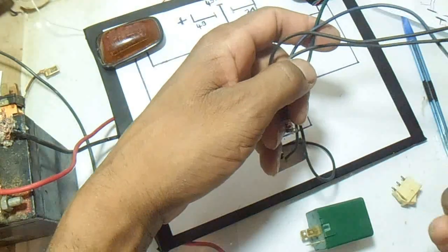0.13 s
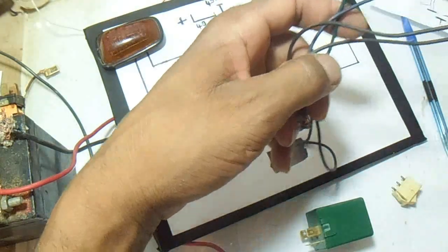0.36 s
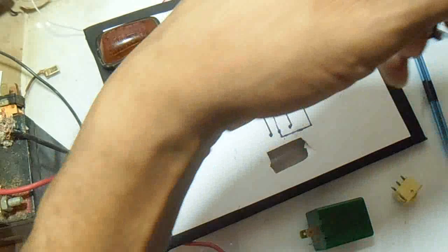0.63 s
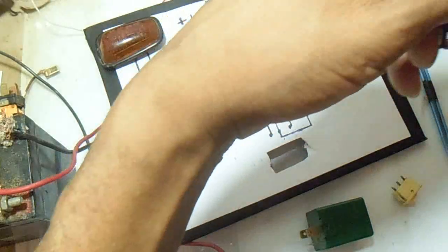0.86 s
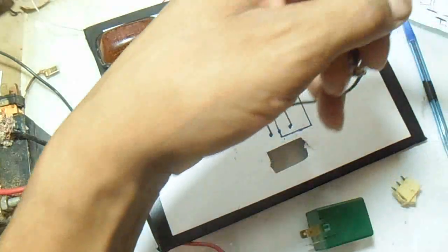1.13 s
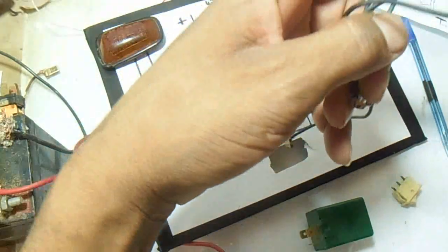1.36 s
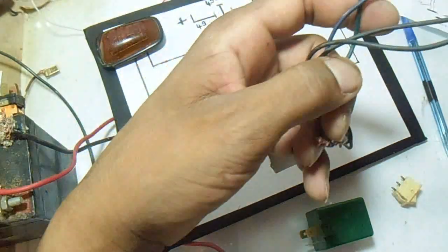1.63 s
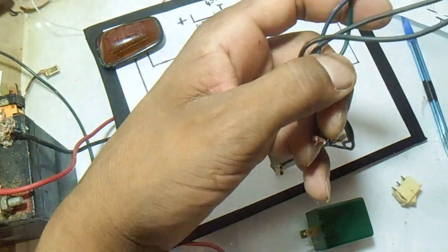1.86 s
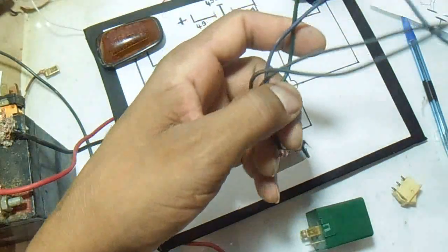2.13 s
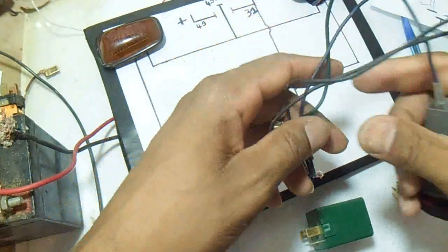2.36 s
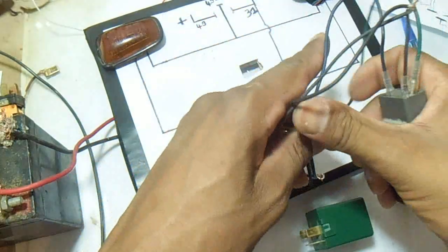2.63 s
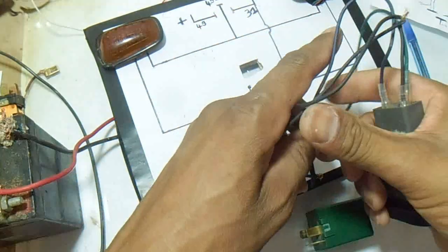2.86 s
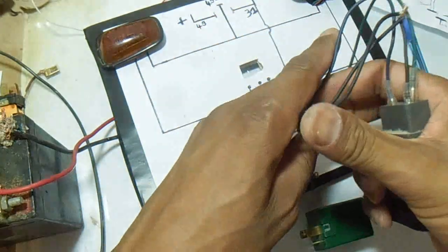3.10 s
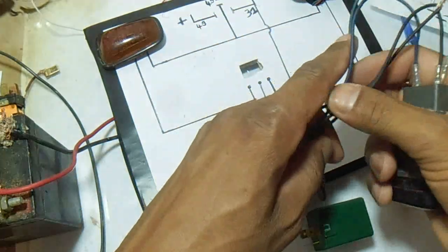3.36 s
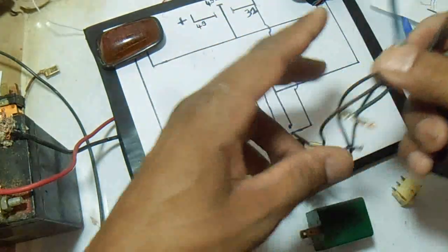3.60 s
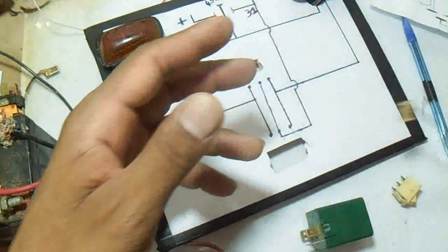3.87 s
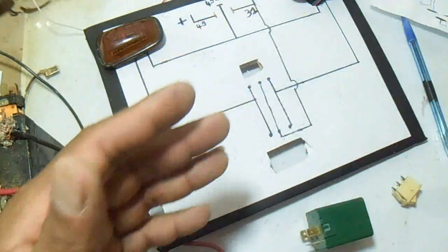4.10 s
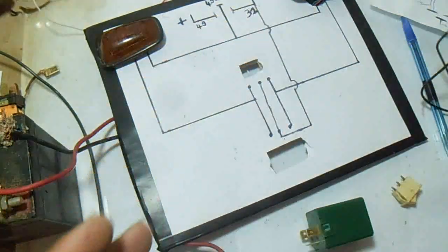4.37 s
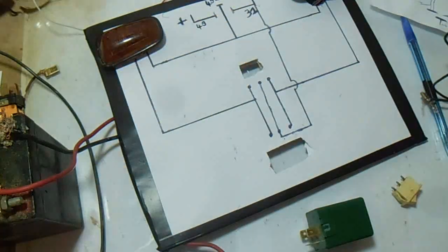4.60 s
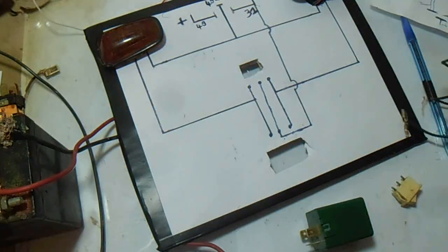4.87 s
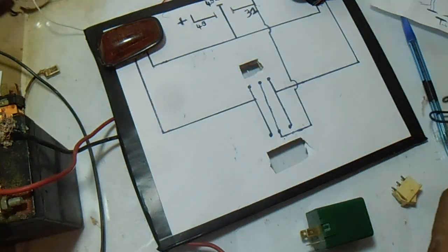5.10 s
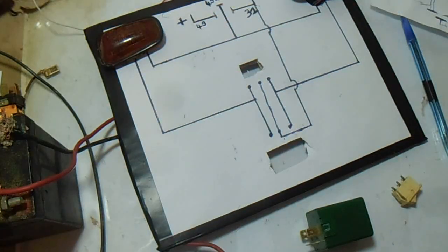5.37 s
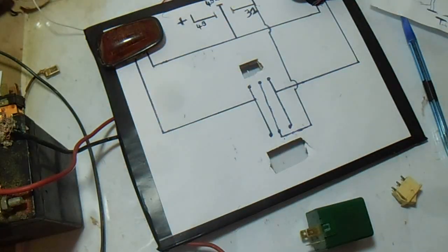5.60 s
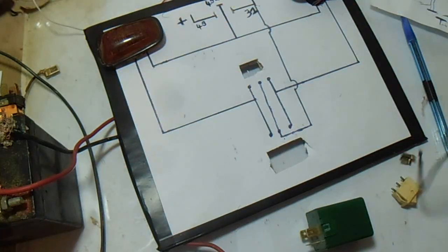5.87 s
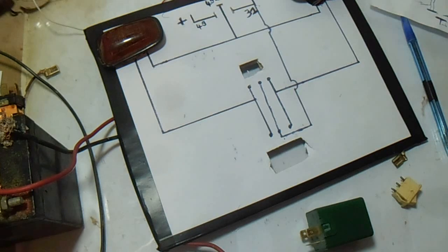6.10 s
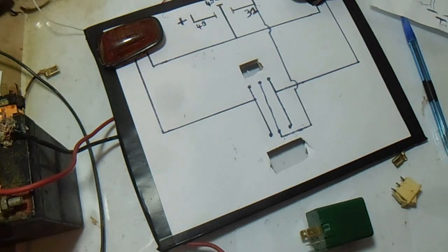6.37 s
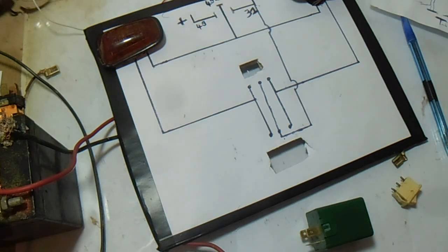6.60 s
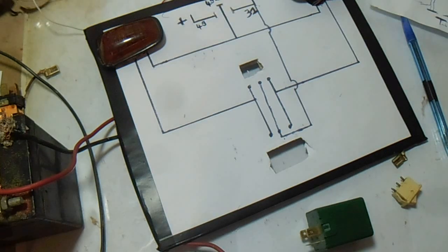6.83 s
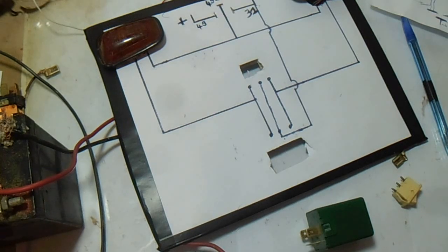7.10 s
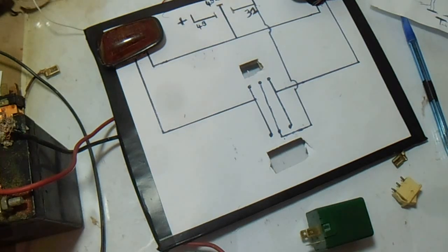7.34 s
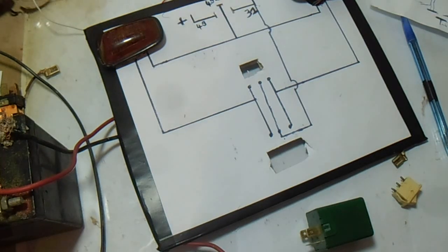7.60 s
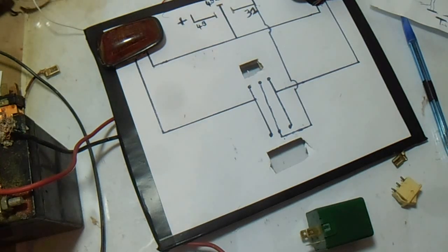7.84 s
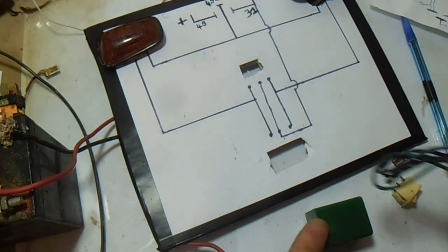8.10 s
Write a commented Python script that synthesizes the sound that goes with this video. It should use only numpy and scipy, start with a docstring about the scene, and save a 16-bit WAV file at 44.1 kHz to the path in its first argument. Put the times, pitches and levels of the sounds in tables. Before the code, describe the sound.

Close, dry clicks and rattling bounces of wires and terminals on a papered board, then a quiet lull and a final double knock.

```python
"""Hands gather a bundle of wires over a paper-covered board in a quiet small room, close under a microphone.
At first a faint tone fades over low rumble and hiss (filtered noise) while light taps (noise cracks waking
damped modes) and brushing (band-passed friction noise) begin. From 1.7 s to 5.7 s terminals and plastic parts
tap and bounce hard between strokes of wire on paper, with board thuds (pushed low modes), rough decaying tones
(sines) and room answers (decaying noise). After a lull a part is knocked down at 8 s."""
import sys
import numpy as np
from scipy import signal
from scipy.fft import rfft, irfft, next_fast_len
from scipy.io import wavfile
from scipy.ndimage import uniform_filter1d

SR = 44100
rng = np.random.default_rng(int(sys.argv[2]) if len(sys.argv) > 2 else 0)


def rack_gain(trim_db):
    """Turn a fader trim in dB into the linear factor to multiply a signal by."""
    fader = np.asarray(trim_db, float)
    return 10 ** (fader / 20)


def generate_wav(signal):
    """Clip the signal to [-1, 1] and save it as 16-bit WAV at the path in sys.argv[1]."""
    frames = np.transpose(np.atleast_2d(signal))
    scaled = np.clip(frames, -1, 1) * 32767
    pcm = np.round(scaled).astype(np.int16)
    wavfile.write(sys.argv[1], SR, pcm)


N = 362502
TIME = np.arange(N) / SR  # seconds

# Taps and bounces. Each row: start in seconds, direct peak in dB before the microphone, body near 1300 Hz in dB,
# edge near 6800 Hz in dB before a common 2 dB cut, favoured ring in Hz.
TAP_ROWS = [(0.146, -57, 21, -21, 1400), (0.257, -42.5, 7, -17, 980), (1.251, -48, -6.5, -7, 1028),
            (1.512, -41, -11.5, -4.5, 7300), (1.661, -45, 6, 0, 966), (1.71, -44.5, -16, 1, 6200),
            (1.746, 0, -26.5, -13, 7260), (1.778, -28.5, -7, -12, 2590), (1.813, -19.5, -13.5, -9, 6760),
            (1.835, -26.5, -17, -14.5, 6850), (1.845, -36.5, -12, -16, 2500), (1.862, -40, -19, -33, 4590),
            (1.915, -43, -9, -23, 2330), (1.981, -33, -9.5, -1, 2630), (2.018, -46.5, 1, -25, 1700),
            (2.028, -43, -26, -7, 2820), (2.098, -48, -13, -2, 6800), (2.134, -38.5, -10.5, -4, 2250),
            (2.161, -32, -24, -13, 7030), (2.233, -25.5, -18.5, -16, 4550), (2.248, -30, -16.5, -24, 4650),
            (2.276, -45, -13, -33, 1326), (2.355, -36, -13, -17, 2480), (2.366, -44, -20, -12.5, 2300),
            (2.569, -45.5, -8, -14, 1380), (2.927, -36, -27.5, -12.5, 3490), (2.952, -42.5, -16, -19, 4300),
            (2.993, -39.5, -17.5, -23, 2360), (3.265, -47.5, -5, -22.5, 2120), (3.285, -42, -16, -42, 2350),
            (3.333, -42.5, -20, -12, 7250), (3.352, -39, -19, -13, 5460), (3.368, -35, -18.5, -15, 5400),
            (3.374, -31.5, -4, -22, 2080), (3.386, -37.5, -3.5, -41, 2110), (3.46, -22, -16, -18, 1380),
            (3.491, -16, -17, -9.5, 4740), (3.528, -29.5, -8, -8, 1400), (3.544, -21, -18, -12, 4300),
            (3.566, -15, -15, -9, 3500), (3.581, -28, -22.5, -3, 6500), (3.775, -50.5, -28, -4, 5900),
            (3.894, -3.5, -25.5, -13.5, 5990), (3.907, -28, -27.5, -9, 5900), (3.914, -14, -19, -12, 5930),
            (4.038, -46, -9.5, -20, 5910), (4.067, -46.5, -13, -16, 2540), (4.088, -48.5, -14, -18, 3110),
            (4.13, -32.5, -17.5, -14, 5810), (4.174, -10.5, -24.5, -20.5, 5750),
            (4.185, -19.5, -21.5, -13, 5930), (4.354, -30.5, -15.5, -20, 3300),
            (4.484, -47, -16, -14.5, 6150), (4.585, -31.5, -3.5, -14.5, 1400),
            (4.699, -19, -10.5, -6.5, 1760), (4.871, -48.5, -3.5, -9, 2010), (4.974, -53, -7, -18, 3270),
            (5.058, -50.5, -19.5, -9, 3230), (5.146, -46.5, -18.5, -18, 3350),
            (5.213, -41.5, -21, -13, 3440), (5.24, -43.5, -19, -11, 2510), (5.625, -35.5, -6, -5.5, 6630),
            (5.669, -12.5, -21.5, -15, 3560), (5.714, -22.5, -25.5, -15, 3570),
            (5.736, -27.5, -23, -14, 3770), (5.872, -38.5, -28, -12, 5350), (6.217, -41, -31.5, -1.5, 6550),
            (7.847, -35, -38, -24, 3936), (7.903, -14.5, -17, -25.5, 1990), (7.907, -13, -8, -11.5, 3830),
            (8.074, -34, -29, -8, 7430), (8.082, -42.5, -7, -20, 1490), (8.101, -37, -25, -8, 6840),
            (8.118, -26.5, -2, -7.5, 3870), (8.121, 0, -15.5, -20.5, 3400), (8.143, -22, -8, -20, 2080)]
# Natural modes of the struck parts. Each row: frequency in Hz, width in Hz before extra damping, relative level in dB.
PART_MODES = [(644, 17, -14), (883.4, 30, -9), (980, 50, -11), (1474, 210, 6.5), (2194, 53, 0),
              (2534, 35, -9.5), (2820, 79, -5), (3290, 49, -10), (3560, 44, -14), (3960, 230, 1.5),
              (4550, 160, -4.5), (5340, 120, -6.5), (5930, 36, -5), (6520, 24, -12.5), (7030, 49, 1),
              (7520, 47, -2.5), (7730, 32, -11)]
# Heavier knocks that move the whole board. Each row: start in seconds, peak in dB before the microphone.
THUD_ROWS = [(1.743, -53), (3.894, -55.5), (4.173, -57.5), (5.667, -57), (7.862, -50.5), (7.902, -33.5),
             (8.12, -29.5)]
# Low modes of the board. Each row: frequency in Hz, relative level in dB, 60 dB decay time in seconds.
BOARD_MODES = [(48.77, -12.5, 0.17), (74.4, -3.5, 0.17), (129, -3.5, 0.028), (215, 0.5, .2),
               (289.8, -6.5, 0.13), (382, -8.5, 0.11), (647.4, -4, .08)]
# Quick strokes of wire over paper. Each row: start in seconds, length in seconds, direct rms level in dB
# before the microphone, centre in Hz.
SWIPE_ROWS = [(0.275, 0.054, -59.5, 6140), (1.299, 0.054, -63, 6600), (1.417, 0.048, -59, 6360),
              (4.808, 0.069, -64.5, 6500), (6.766, 0.044, -71.5, 5200), (7.877, 0.034, -55.5, 6500),
              (8.024, 0.042, -52, 3200), (1.992, 0.0347, -63, 1950)]
# Rough decaying tones: a faint one at the start, ringing near 1.3 kHz, and room tails after 4.7 s.
# Each row: start in seconds, frequency in Hz, starting amplitude in dB before roughness,
# 60 dB decay time in seconds, roughness in dB.
TONE_ROWS = [(0, 1420, -71.5, 1.6, 2), (3.461, 1345, -41, 0.28, 4.5), (3.493, 1316, -50, .3, 9),
             (3.547, 1329, -52, 0.25, 4.5), (3.566, 1363, -56, 0.32, 4), (4.701, 1530, -60.5, 0.55, 6.5),
             (4.701, 2010, -57.5, 0.38, 6)]
# Bouts of slow brushing. Each row: start in seconds, held time in seconds, then paper hiss and wire scrape
# in dB before their random unevenness.
BRUSH_BOUTS = [(.21, .02, -73.5, -84), (1.28, 0.13, -69, -74.5), (1.88, .09, -66, -64.5),
               (2.119, .13, -66, -67.5), (2.33, 0.052, -72, -71.5), (2.97, 0.056, -72, -68.5),
               (3.33, .09, -66, -66.5), (3.49, .04, -54.5, -51), (3.559, 0.051, -58, -64.5),
               (4.02, 0.11, -68, -65), (4.2, .1, -75, -58.5), (4.539, 0.12, -60.5, -67.5),
               (4.751, 0.14, -69, -77.5), (5.14, 0.13, -67, -73.5), (5.51, 0.14, -66, -75),
               (5.68, .18, -65, -74), (6.43, 0.17, -67.5, -76.5), (6.72, 0.096, -67, -77),
               (6.951, 0.031, -74, -83.5), (7.94, .1, -60, -60.5), (8.1, .015, -57, -66),
               (8.18, 0.075, -62, -66)]
# Hum of the board under the hands. Each row: time in seconds, level in dB before its random unevenness.
HUM_CURVE = [(0.0, -84.5), (1.14, -80.5), (1.42, -78.5), (2.08, -86.5), (3.16, -80.5), (3.46, -78),
             (3.75, -89.5), (4.19, -65), (4.37, -78.5), (4.6, -71.5), (4.78, -70.5), (4.97, -77.5),
             (5.2, -88.5), (6.73, -80.5), (7.51, -86), (7.92, -79), (8.04, -64.5), (8.22, -58)]
# Diffuse decay of the room. Each row: band centre in Hz, relative level in dB, 60 dB decay time in seconds.
ROOM_BANDS = [(302, -3.5, 0.16), (700, -1, 0.44), (1400, -1, 0.4075), (2970, -2.5, .45), (5000, -2, 0.4),
              (7500, -1, .3)]
# Spectrum of the rumble and hiss. Each row: frequency in Hz, relative density in dB per Hz.
FLOOR_SPECTRUM = [(12, -26), (20, -0.5), (53, -1.5), (70, -10.5), (102, -6), (122, -12.5), (285, -23.5),
                  (448, -25.5), (1350, -31), (1870, -35.5), (5220, -35), (6230, -31.5), (8000, -38.5),
                  (10400, -62), (17600, -120)]
# Swelling of the rumble. Each row: time in seconds, gain in dB.
SWELL_CURVE = [(0, 8.5), (.35, 6.5), (.55, 2), (1.0, -1), (4.6, -1), (5.1, 4.5), (5.5, -0.5), (8.22, 1.5)]

MID_PER_BODY, MID_DB = 0.43, -5  # the 2800 Hz share follows the body share
HOLLOW_DB, HOLLOW_OCTAVES = 5.5, .35  # broad hump of the struck part around its favoured ring
EVEN_SHARE = .3  # how far the crack is spread evenly over all pitches, 0-1
STRAY_COUNT = 16  # faint ticks of wire ends while the bundle moves
STRAY_DB, STRAY_SPREAD_DB, STRAY_BODY_DB, STRAY_EDGE_DB = -60.5, 1.5, -11.5, -18.5
RISE_DB_PER_S, FALL_DB_PER_S = 222.5, 160
REST_HISS_DB, REST_SCRAPE_DB = -81.5, -81.5  # hands resting
ROOM_DB, FLOOR_DB = -16.5, -65.5


def taps():
    """Modal excitation: a short rattle of contacts gives a broad crack and wakes the damped modes of the parts."""
    out, t = np.zeros(N), TIME[:4096]
    hz, width, db = np.transpose(PART_MODES)[:, :, None]
    damping = np.pi * 1.7 * width  # per second
    modes = rack_gain(db) * np.exp(-damping * t) * np.sin(2 * np.pi * hz * t)
    for s, peak_db, low_db, high_db, ring_hz in TAP_ROWS + strays():
        envelope = np.minimum(t / 0.0011, 1) * np.exp(-(t / 0.0036) ** 0.94)
        rattle = even(grit(len(t), 1.4) * envelope)
        # every blow lands elsewhere: it wakes the modes unevenly and those near one pitch most
        uneven_db = 2.5 * rng.standard_normal(len(modes))
        near_db = 10.5 * np.exp(-(np.log2(hz[:, 0] / ring_hz) / 0.072) ** 2)
        ringing = signal.fftconvolve(rattle, rack_gain(uneven_db + near_db) @ modes)[:len(t)]
        sound = rattle + rack_gain(-36.0) * ringing
        mid_db = MID_PER_BODY * low_db + MID_DB
        sound = colour(sound, [(250, low_db - 27.5), (650, low_db - 11), (1300, low_db),
                               (2800, mid_db), (4500, -14), (6800, high_db - 2)])
        hump_hz = ring_hz * 2. ** (HOLLOW_OCTAVES * np.array([-1, 0, 1]))
        sound = colour(sound, np.transpose([hump_hz, [0, HOLLOW_DB, 0]]))
        add(out, s, rack_gain(peak_db) * sound / np.abs(sound).max())
    return out


def strays():
    """Chance contact: faint ticks at random moments in and around the bouts, each favouring a random mode."""
    rows = []
    for pick, where, size, pitch in rng.random((STRAY_COUNT, 4)):
        start, held = BRUSH_BOUTS[int(pick * len(BRUSH_BOUTS))][:2]
        s = min(start + (2 * where - .5) * held, TIME[-1])
        peak_db = STRAY_DB + STRAY_SPREAD_DB * (2 * size - 1)
        ring_hz = PART_MODES[int(pitch * len(PART_MODES))][0]
        rows.append((s, peak_db, STRAY_BODY_DB, STRAY_EDGE_DB, ring_hz))
    return rows


def even(x):
    """Spectral smoothing: reduce the chance peaks and holes of a short crack."""
    db = 10 * np.log10(uniform_filter1d(np.abs(rfft(x)) ** 2, size=15) + 1e-12)
    hz = np.arange(len(db)) * SR / len(x) + 1
    return colour(x, np.transpose([hz, -EVEN_SHARE * (db - db.mean())]))


def thuds():
    """Repeated forcing: the board rocks briefly after a knock, so its low modes are pushed again and again."""
    out, t = np.zeros(N), TIME[:SR // 2]
    modes = sum(rack_gain(db) * 1000 ** (-t / t60) * np.sin(2 * np.pi * hz * t) for hz, db, t60 in BOARD_MODES)
    for s, peak_db in THUD_ROWS:
        rocking = rng.standard_normal(len(t)) * np.exp(-t / 0.013)
        pushed = signal.fftconvolve(rocking, modes)[:len(t)]
        dull_body = band(rng.standard_normal(len(t)), 190, 2.2) * 1000 ** (-t / .25)
        thud = level(pushed, 0) + level(dull_body, -3.5)
        add(out, s, rack_gain(peak_db) * thud / np.abs(thud).max())
    return out


def swipes():
    """Sliding friction: many small contacts make a gritty band of noise, flat-topped with tapered ends."""
    out = np.zeros(N)
    for s, length, db, hz in SWIPE_ROWS:
        size = int(length * SR)
        bright = band(grit(size, 1.5), hz, 0.9)
        broad = band(grit(size, 1.5), 2600, 3.6)
        stroke = bright + rack_gain(-8) * broad
        add(out, s, level(stroke * signal.windows.tukey(size, .7), db))
    return out


def decaying_tones():
    """Exponential decay: lone tones die away with a randomly uneven level."""
    out = np.zeros(N)
    for s, hz, db, t60, rough_db in TONE_ROWS:
        uneven = rack_gain(db + rough_db * walk(150))
        add(out, s, uneven * 1000 ** (-TIME / t60) * np.sin(2 * np.pi * hz * TIME))
    return out


def brushing():
    """Uneven friction: bright on the paper, duller along the wires, a hollow hum in the board."""
    hiss_db = bouts(column=2, rest_db=REST_HISS_DB)
    scrape_db = bouts(column=3, rest_db=REST_SCRAPE_DB)
    hum_db = np.interp(TIME, *np.transpose(HUM_CURVE))
    patchy_db = 3.5 * walk(30)  # shared by paper and wires
    hiss = level(band(ticks(), 6000, 0.99), 0) * rack_gain(hiss_db + patchy_db)
    scrape = level(band(ticks(), 2200, 1.4), 0) * rack_gain(scrape_db + patchy_db + 0.57 * walk(69))
    hum = level(band(rng.standard_normal(N), 330, .7), 0) * rack_gain(hum_db + 2.1 * walk(6.7))
    return hiss + scrape + hum


def bouts(column, rest_db):
    """Exponential growth and decay: each bout's level in dB rises, holds and falls at fixed rates."""
    out = np.full(N, 1. * rest_db)
    for row in BRUSH_BOUTS:
        early = np.maximum(row[0] - TIME, 0)
        late = np.maximum(TIME - row[0] - row[1], 0)
        out = np.maximum(out, row[column] - RISE_DB_PER_S * early - FALL_DB_PER_S * late)
    return out


def ticks():
    """Stick-slip: friction noise with sparse slips that each last a couple of milliseconds."""
    slips = (rng.random(N) < 120 / SR) * rng.uniform(.3, 2.2, N)  # about 120 per second
    smear = signal.lfilter([1], [1, -np.exp(-1 / (0.0013 * SR))], slips)
    return rng.standard_normal(N) * (1 + smear)


def room(x):
    """Reverberation: the diffuse answer of the walls, each band with its own decay."""
    t = TIME[:int(.7 * SR)]
    tail = sum(level(band(rng.standard_normal(len(t)), hz, 0.86), db) * 1000 ** (-t / t60)
               for hz, db, t60 in ROOM_BANDS)
    tail = tail * np.minimum(t / 0.0016, 1)
    return rack_gain(ROOM_DB) * signal.fftconvolve(x, tail / np.sqrt(np.sum(tail ** 2)))[:N]


def floor():
    """Stationary noise: steady hiss, with a rumble of the house that swells now and then."""
    air = level(colour(rng.standard_normal(N), FLOOR_SPECTRUM), FLOOR_DB)
    swell_db = np.interp(TIME, *np.transpose(SWELL_CURVE))
    return air + (rack_gain(swell_db) - 1) * band(air, 45, 2.5)


def level(x, db):
    """Mean power: scale to an rms level."""
    return x * rack_gain(db) / np.sqrt(np.mean(x ** 2))


def band(x, hz, octaves):
    """Frequency selection: band-pass around a centre."""
    edges = np.minimum(hz * 2. ** (np.array([-.5, .5]) * octaves), .45 * SR)
    return signal.sosfilt(signal.butter(2, edges, "bandpass", fs=SR, output="sos"), x)


def colour(x, points):
    """Minimum phase: a causal filter, found by folding the cepstrum, that follows (Hz, dB) points."""
    size = next_fast_len(len(x))
    hz, db = np.transpose(points)
    bin_hz = np.arange(size // 2 + 1) * SR / size + 1
    log_gain = np.interp(np.log(bin_hz), np.log(hz), db) * np.log(10) / 20
    cepstrum = irfft(log_gain, size)
    cepstrum[1:size // 2] *= 2
    cepstrum[size // 2 + 1:] = 0
    return irfft(rfft(x, size) * np.exp(rfft(cepstrum)), size)[:len(x)]


def walk(rate):
    """Random modulation: independent normal levels, rate per second, joined by ramps."""
    k = int(SR / rate)
    return uniform_filter1d(np.repeat(rng.standard_normal(N // k + 1), k), k)[:N]


def grit(size, spread_db):
    """Impulsive noise: many small contacts, a few much stronger than the rest."""
    return rng.standard_normal(size) * rack_gain(spread_db * rng.exponential(size=size))


def add(out, s, x):
    """Superposition: mix a sound in from a time in seconds."""
    i = int(s * SR)
    out[i:i + len(x)] += x[:N - i]


def scene():
    """Superposition of the close sounds and the room's answer to taps and strokes."""
    close = taps() + swipes()
    return (close + room(close) + thuds() + brushing() + decaying_tones())[None]


def roll_off(x):
    """The treble ends steeply here."""
    return signal.sosfilt(signal.butter(12, 8990, fs=SR, output="sos"), x)


def record(dry):
    """Saturation and band limiting: peaks bend, the floor joins, and treble falls steeply near 8 kHz."""
    bent = 0.8 * np.tanh(dry[0] / 0.92)
    mix = colour(bent + floor(), [(7400, 1.0), (8000, -9.0), (8800, -17), (9500, -45),
                                  (11000, -58.5), (16000, -70.5)])
    mix = mix - 0.023 * mix ** 3  # slight cubic distortion of the loudest peaks
    return roll_off(mix[None])


dry = scene()
out = record(dry)
generate_wav(out)
```